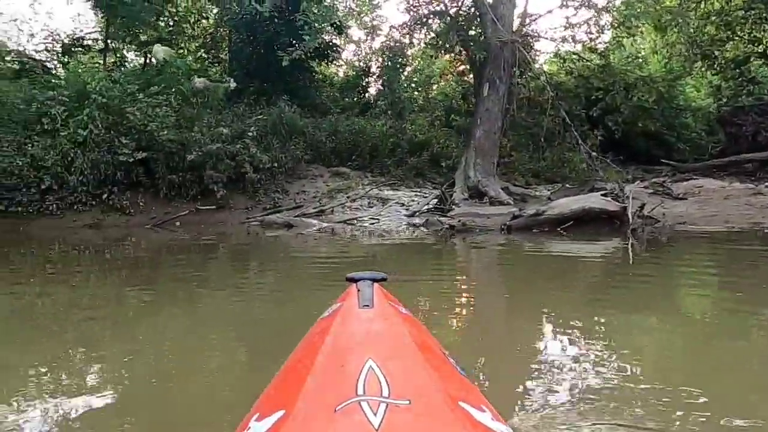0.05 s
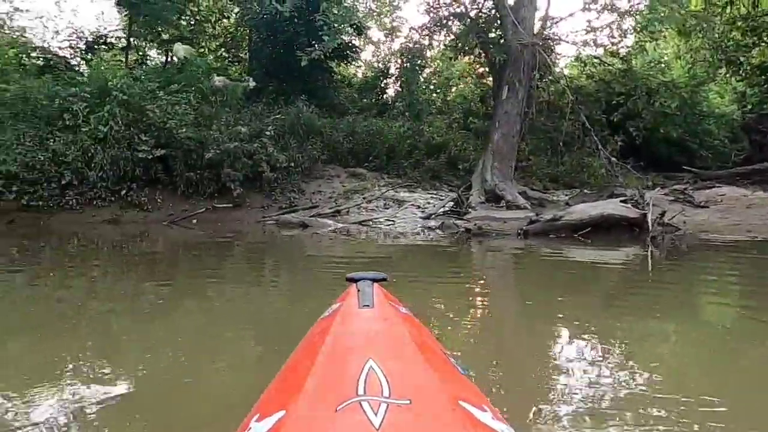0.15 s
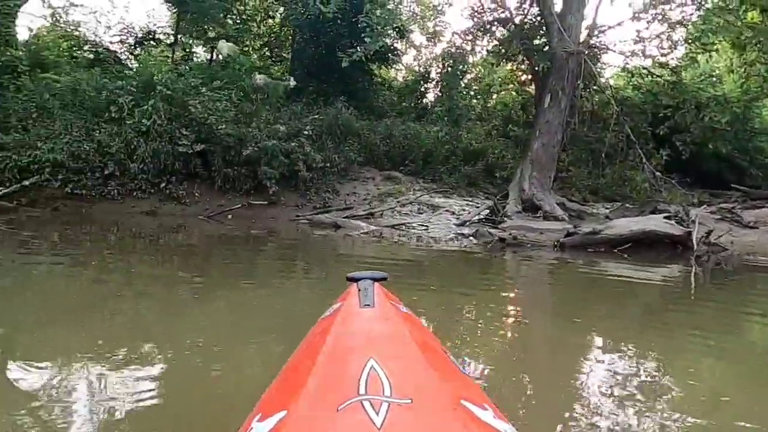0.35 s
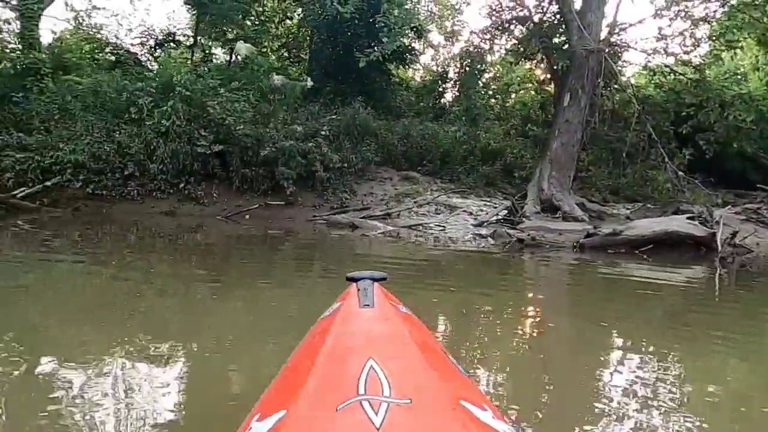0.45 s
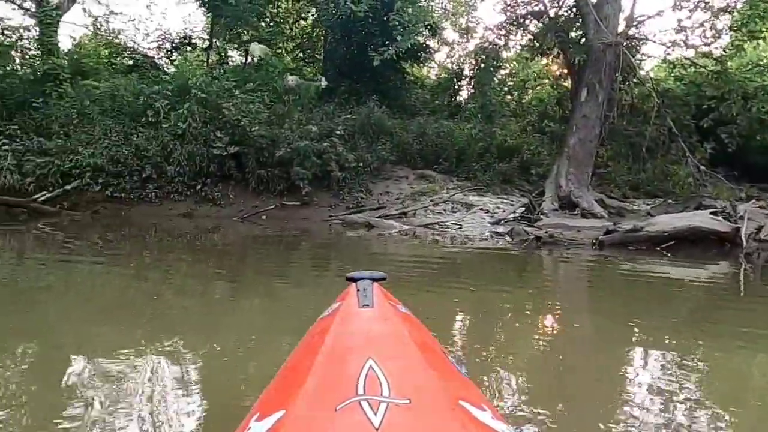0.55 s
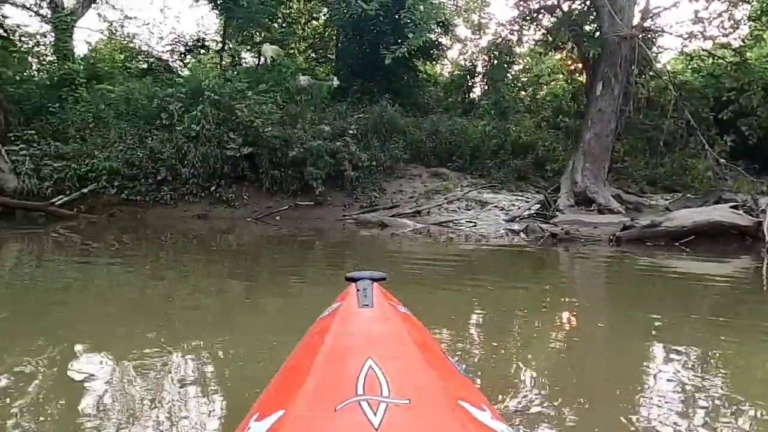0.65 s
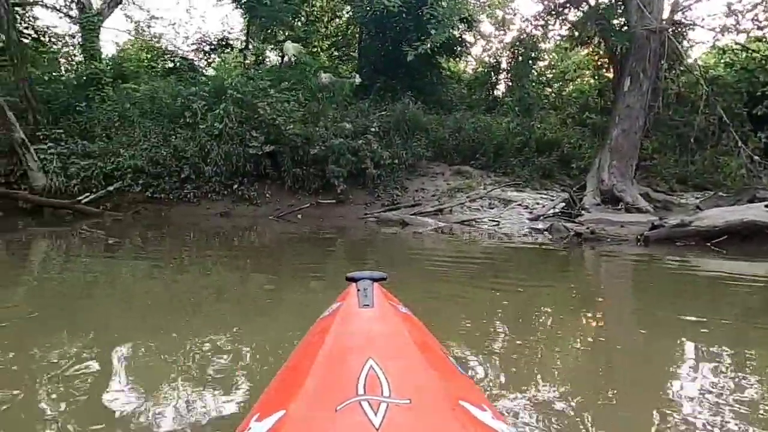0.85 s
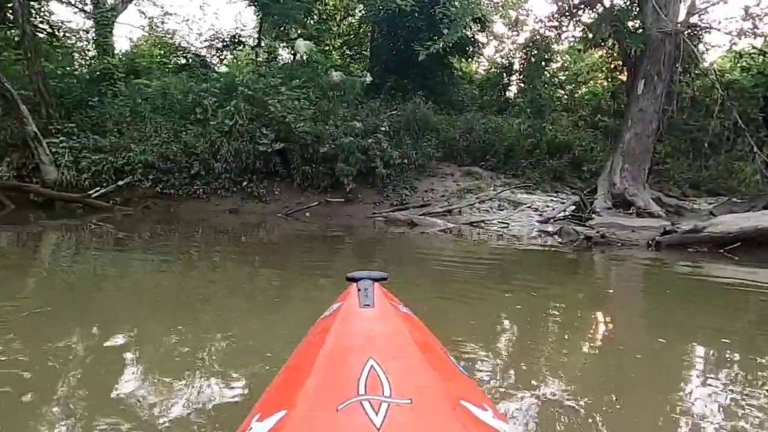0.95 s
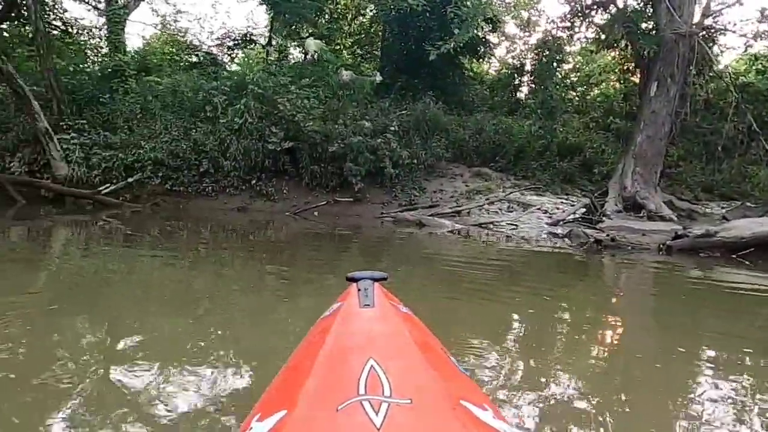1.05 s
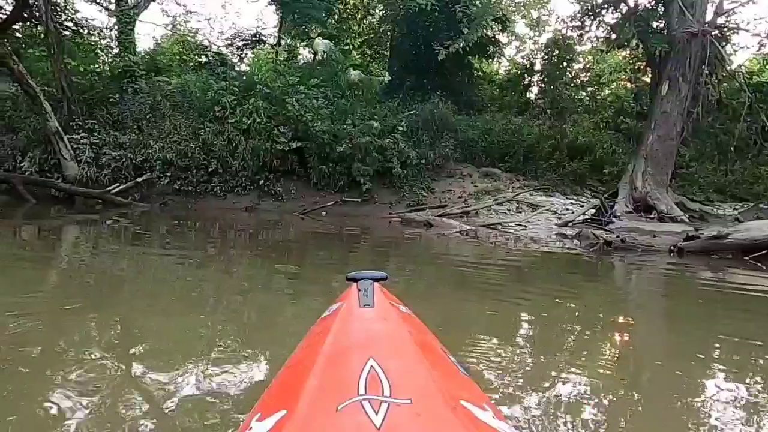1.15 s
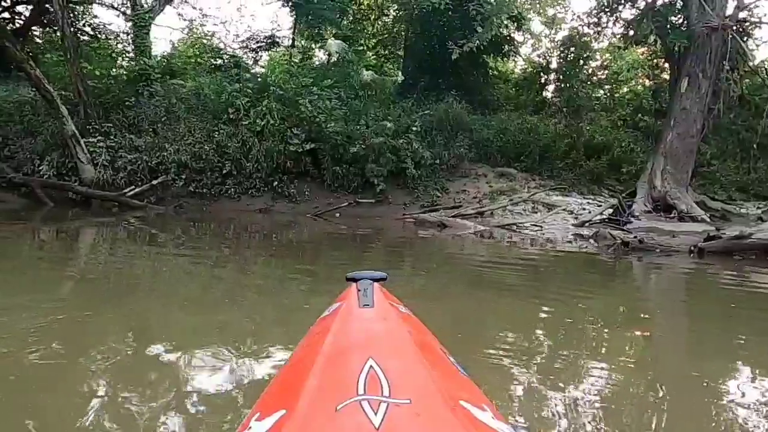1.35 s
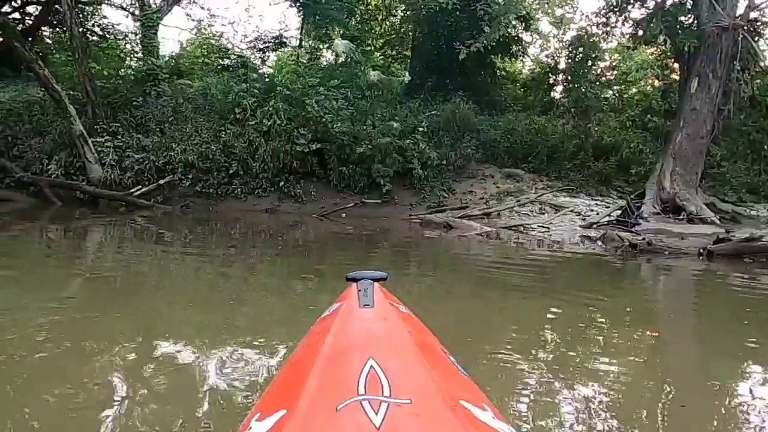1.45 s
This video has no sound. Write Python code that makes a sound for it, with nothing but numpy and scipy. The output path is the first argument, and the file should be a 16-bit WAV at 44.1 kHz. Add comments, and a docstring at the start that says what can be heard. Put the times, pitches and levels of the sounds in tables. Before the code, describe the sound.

A single kayak paddle stroke heard close from the boat: a few bright drips, then the blade plops in with hollow gulps and a bubbly splash, fading to small drips over faint low water rumble outdoors.

```python
"""One kayak paddle stroke on a calm river, heard from the boat.
Drips off the raised blade ring first, as swelling sines led by the right ear, with noise cracks and spatters.
The other blade plops in, gulps air and churns: ringing pockets, gliding sines and low shoves over bubble swarms.
Its wake of small bubbles and swirls then fades as the lead passes to the left ear.
A low rumble of filtered noise runs beneath, with soft reflections from the deck and the bank throughout."""
import sys
import numpy as np
from scipy import signal
from scipy.fft import rfft, irfft, next_fast_len
from scipy.io import wavfile
from scipy.ndimage import map_coordinates

SR = 44100
rng = np.random.default_rng(int(sys.argv[2]) if len(sys.argv) > 2 else 0)


def put_to_file(sound):
    """Save the sound as 16-bit audio at rate SR, in the file named by the first command-line argument."""
    columns = np.atleast_2d(sound).T  # one column per channel
    safe = np.clip(columns, -1, 1)
    whole_steps = np.round(safe * 32767)
    wavfile.write(sys.argv[1], SR, whole_steps.astype(np.int16))


N = 66150  # samples, 1.5 s


def amp(db):
    """Decibels to gain."""
    return 10 ** (np.asarray(db) / 20)


def unit(x):
    """Scale to rms 1."""
    return x / np.sqrt(np.mean(x ** 2) + 1e-20)


def curves(rows):
    """Draw straight lines between rows: one value per sample for each column after the time."""
    times, *columns = np.transpose(rows)
    return np.array([np.interp(np.arange(N) / SR, times, column) for column in columns])


def filtered(x, response):
    """Shape the spectrum of x by a gain that depends on frequency, without phase shift."""
    size = next_fast_len(N + 8192)  # room past the end for the filter to ring
    gain = response(np.fft.rfftfreq(size, 1 / SR))
    return irfft(rfft(x, size) * gain, size)[..., :N]


def coloured(x, points):
    """Equalise x through (frequency [Hz], gain [dB]) points on a log frequency axis."""
    f, db = np.transpose(points)
    return filtered(x, lambda hz: amp(np.interp(np.log(hz + 1), np.log(f), db)))


def add(out, s, sound):
    """Mix a short sound in at time s."""
    part = out[max(0, round(s * SR)):][:len(sound)]
    part += sound[:len(part)]


def tremble(hz, size):
    """The pocket wall trembles: a smooth random gain around 1 that changes about once a cycle."""
    roughness = 0.26  # depth, 0-1
    knots = np.arange(size) * hz / SR
    return 1 + roughness * map_coordinates(rng.standard_normal(size), [knots])


def bubble(t, hz, cycles):
    """A pocket of air swells to its peak in a few cycles and dies, rising a little in pitch."""
    phase_rise, sharpness = 0.01, 1.5  # phase stretch per time to the peak; exponent of the swell
    u = t * hz / cycles  # 1 at the peak
    swell = (u * np.exp(1 - u)) ** sharpness
    return swell * np.sin(2 * np.pi * hz * t * (1 + phase_rise * (u - 1)))


def plops(rows):
    """Each row rings one trembling pocket of air."""
    out, t = np.zeros(N), np.arange(SR // 6) / SR
    for s, hz, db, cycles in rows:
        add(out, s, amp(db) * bubble(t, hz, cycles) * tremble(hz, len(t)))
    return out


def swarm(level, colour, hz, spread, cycles, scatter_db, wash_db, count, size):
    """Many small bubbles of random pitch and strength on a wash of noise, following a level curve."""
    when, pitch, life, strength = rng.random((count, 4)).T[:, :, None]
    grain_hz = hz * 2 ** (spread * (2 * pitch - 1))  # spread in octaves either way
    grains = bubble(np.arange(size) / SR, grain_hz, cycles * (.5 + life))
    grains = grains * amp(scatter_db * strength ** 2)  # a few stand out
    # evenly spaced starts, each jittered by up to two spacings
    starts = ((np.arange(count)[:, None] + 2 * when) * N / count).astype(int)
    cloud = np.bincount((starts + np.arange(size)).ravel(), grains.ravel(), N)[:N]
    wash = unit(coloured(rng.standard_normal(N), colour))
    water = unit(coloured(cloud, colour)) + amp(wash_db) * wash
    return unit(water) * amp(curves(level)[0])


def air_pockets():
    """Drips and the plunging blade trap single pockets of air, which ring."""
    # single pockets: (time [s], pitch [Hz], peak level before trembling [dB], time to peak [cycles])
    pocket_rows = [(.0655, 3600, -29.5, 2.2), (.0738, 1600, -30.5, 1.75), (.080, 3210, -28.5, 3),
                   (.0955, 1180, -30.5, 1.36), (.1498, 2010, -28, 2.8), (.1668, 3670, -18, 2.2),
                   (.1798, 568, -27.5, 1.54), (.2048, 2286, -19.5, 2.4), (.211, 2740, -21, 2.8),
                   (.261, 1060, -31.5, 4.1), (.2932, 1080, -16, 1.24), (.3005, 932, -11.5, 2.24),
                   (.305, 1690, -23, 3), (.321, 855, -19, 1.5), (.3275, 1047, -23.5, 3.5),
                   (.4135, 1200, -14.5, 4.5), (.515, 1340, -17.5, 1.3), (.5215, 744, -12.5, 1.1),
                   (.523, 1930, -21, 3.5), (.5355, 594, -21, 2.7), (.6672, 1095, -23, 2.1),
                   (.687, 2250, -21.5, 4), (.7835, 1710, -22, 2.6), (.8255, 3230, -30, 4),
                   (.8295, 5470, -32, 4.6), (.8985, 964, -24, 2), (.9215, 1240, -29, 2.9),
                   (1.0485, 4130, -39, 4), (1.128, 1380, -29, 2.6), (1.1275, 3450, -33.5, 3),
                   (1.2466, 1740, -22.5, 0.98), (1.2468, 6650, -31, 1.2), (1.2922, 944, -26.5, 0.99),
                   (1.4138, 884, -25.5, 2.3), (1.4505, 6400, -40.5, 3.2)]
    return plops(pocket_rows)


def shoves():
    """The blade shoves water, heard as low, briefly ringing thumps."""
    # pushes: (time [s], pitch [Hz], peak level before trembling [dB], time to peak [cycles])
    shove_rows = [(.365, 151, -28, 0.78), (.365, 56, -34, 1.3), (.496, 253, -19.5, 1.1),
                  (.511, 166.7, -22.5, 2.1), (.5165, 298, -14.5, 0.58)]
    return plops(shove_rows)


def gurgles():
    """Air pockets glide in pitch, unevenly, as they change size: up as they shrink, down as they grow."""
    # glides: (time [s], length [s], start pitch [Hz], end pitch [Hz], peak level before trembling [dB])
    glide_rows = [(0.306, 0.064, 245.4, 307, -28.5), (0.352, 0.0206, 856, 1254, -23.5),
                  (0.37, .016, 1378, 2140, -25), (0.426, .028, 537, 816, -22.5),
                  (0.462, 0.0092, 1174, 810, -17), (1.034, 0.12, 91.6, 106.7, -36.5),
                  (1.081, 0.0225, 734, 964, -32.5), (1.29, 0.15, 103.6, 195, -42.5),
                  (1.419, .016, 1010, 840, -32.5)]
    out = np.zeros(N)
    for s, length, start_hz, end_hz, db in glide_rows:
        u = np.linspace(0, 1, int(length * SR))
        shake = tremble(start_hz, SR // 4)[:len(u)]
        glide_hz = start_hz * (end_hz / start_hz) ** u * (1 + shake) / 2  # half the tremble bends the pitch
        phase = 2 * np.pi * np.cumsum(glide_hz) / SR
        add(out, s, amp(db) * np.sin(np.pi * u) * shake * np.sin(phase))
    return out


def churn():
    """Big bubbles stirred up by the blade make a low, lumpy swarm."""
    # swell of the churn: (time [s], level [dB])
    churn_level = [(0, -43), (.24, -54.5), (.275, -34), (.33, -42), (.40, -32), (.44, -28), (.475, -41),
                   (.505, -27.5), (.57, -28.5), (.70, -33.5), (.78, -29), (.87, -36), (1.2, -39.5),
                   (1.36, -45.5)]
    # equaliser of the churn: (frequency [Hz], gain [dB])
    churn_colour = [(40, -25), (110, -4.5), (300, 1), (450, 4), (650, 2), (900, -13), (2000, -63)]
    return swarm(churn_level, churn_colour, hz=394.0, spread=1.297, cycles=1.1,
                 scatter_db=12, wash_db=-2.5, count=450, size=1800)


def splash():
    """Middling bubbles stirred up by the blade make a splashing swarm above the churn."""
    # swell of the splash: (time [s], level [dB])
    splash_level = [(.245, -49.5), (.28, -34), (.40, -39), (.45, -29.5), (.49, -30.5), (.525, -20.5),
                    (.555, -30.5), (.72, -37.5), (.785, -32), (.84, -36), (.95, -37), (1.14, -40),
                    (1.37, -45), (1.5, -45)]
    # equaliser of the splash: (frequency [Hz], gain [dB])
    splash_colour = [(250, -50), (600, -6), (950, -0.5), (1550, -3.5), (2100, -3.5), (2900, -11.5),
                     (6000, -51)]
    return swarm(splash_level, splash_colour, hz=1276, spread=0.937, cycles=1.63,
                 scatter_db=11.5, wash_db=-3.5, count=950, size=800)


def slaps():
    """A falling drop cracks on the surface: a band of noise that dies at once."""
    # drops: (time [s], peak level [dB])
    slap_rows = [(0.2113, -20.5), (.7853, -27.5), (1.247, -24.5), (1.4798, -44)]
    t60, low_hz, top_hz = 0.013, 670, 4670  # decay by 60 dB (s) and noise band
    out, t = np.zeros(N), np.arange(SR // 40) / SR
    band = signal.butter(3, [low_hz, top_hz], 'band', fs=SR, output='sos')
    for s, db in slap_rows:
        crack = signal.sosfilt(band, rng.standard_normal(len(t)) * amp(-60 * t / t60))
        add(out, s, amp(db) * crack / np.abs(crack).max())
    return out


def spatters():
    """A handful of droplets patters down, each trapping a tiny bubble."""
    # handfuls: (time [s], peak level [dB])
    handful_rows = [(.205, -23.5), (.355, -24), (.419, -27), (.450, -23), (.460, -25.5), (.502, -23),
                    (.684, -29.5), (0.733, -32.5), (.853, -29), (.953, -28)]
    handful_s, droplet_hz, octaves, cycles = .014, 3040, 0.87, 0.88  # octaves: scale of the pitch spread
    out, t = np.zeros(N), np.arange(SR // 200) / SR
    for s, db in handful_rows:
        patter = np.zeros(SR // 20)
        for when, pitch in zip(rng.random(size=36), rng.uniform(-1.05, 1, size=36)):
            droplet = bubble(t, droplet_hz * 2 ** (octaves * pitch), cycles)
            add(patter, when * handful_s, rng.uniform(-1.12, 1) * droplet)  # random strength and sign
        add(out, s, amp(db) * patter / np.abs(patter).max())
    return out


def spray():
    """Tiny bubbles and droplets make a fine, bright swarm."""
    # swell of the spray before mixing: (time [s], level [dB])
    spray_level = [(.12, -49.5), (.22, -48), (.26, -47), (.31, -42.5), (.40, -45), (.455, -38.5),
                   (.485, -40), (.545, -35.5), (.575, -41), (.72, -46.5), (.78, -41), (.91, -50.5),
                   (.96, -50.5), (1.15, -50), (1.5, -62)]
    # equaliser of the spray: (frequency [Hz], gain [dB])
    spray_colour = [(1000, -11), (2000, -10), (2700, -6.5), (3900, -8.5), (7000, -16), (9000, -19.5),
                    (12000, -44)]
    return swarm(spray_level, spray_colour, hz=4200, spread=1.016, cycles=1.93,
                 scatter_db=21.5, wash_db=-2.5, count=1300, size=300)


def strewn_spray():
    """Independent spray on each side, strongest in the treble, sounds wide."""
    # equaliser of the wide spray: (frequency [Hz], gain [dB])
    wide_colour = [(1500, -16), (4000, -4.5), (8000, -0.5)]
    return coloured(np.array([spray(), spray()]), wide_colour)


def rumble():
    """Water pushing along the hull, as low filtered noise."""
    # swell of the rumble: (time [s], level [dB])
    rumble_level = [(0, -40), (.11, -39), (.17, -47.5), (.33, -50), (.39, -46), (.54, -35), (.68, -37.5),
                    (.95, -45), (1.25, -45), (1.5, -53)]
    # equaliser of the rumble: (frequency [Hz], gain [dB])
    rumble_colour = [(20, -27.5), (36, -7.5), (50, -4), (75, -2), (170, -5), (300, -13.5), (1000, -55.5)]
    return unit(coloured(rng.standard_normal(N), rumble_colour)) * amp(curves(rumble_level)[0])


def placed(x):
    """The ear that leads passes from right to left, while a separate treble balance tilts the sides."""
    # path: (time [s], lead of the right ear [microseconds], left-over-right treble [dB])
    path = [(0, 88, 7.5), (.3, 82.5, -2), (.5, 46.5, 1.5), (.9, 27, 3.5), (1.28, -28, 10)]
    shadow_hz = 690  # the balance acts above this
    lead_us, pan_db = curves(path)
    low = filtered(x, lambda hz: 1 / (1 + (hz / shadow_hz) ** 2))
    treble = x - low
    shift = lead_us * SR / 2e6  # half the lead, in samples, for each ear
    ears = []
    for side in (1, -1):  # left, right
        tilted = low + treble * amp(side * pan_db / 2)
        ears.append(map_coordinates(tilted, [np.arange(N) - side * shift]))
    return np.array(ears)


def echoes(x, t60):
    """A diffuse tail of decaying noise, different on each side."""
    t = np.arange(SR // 3) / SR
    tail = rng.standard_normal((2, len(t))) * amp(-60 * t / t60)
    tail = tail / np.linalg.norm(tail, axis=1, keepdims=True)
    return signal.fftconvolve(x[None], tail, axes=1)[:, :N]


def deck(water):
    """Short reflections scatter off the deck."""
    # equaliser of the deck: (frequency [Hz], gain [dB])
    deck_colour = [(100, -17.5), (500, -38), (1200, -17.5), (2600, -7.5)]
    return coloured(echoes(water, t60=0.041), deck_colour)


def bank(water):
    """The bank answers faintly with a longer tail."""
    return amp(-19) * echoes(water, t60=0.52)


def scene():
    """The stroke with widely strewn spray, reflections from the deck and a faint answer from the bank."""
    blade = air_pockets() + shoves() + gurgles() + churn() + splash()
    drops = slaps() + spatters() + amp(-0.5) * spray()
    water = blade + drops + rumble()
    return placed(water) + strewn_spray() + deck(water) + bank(water)


def record(dry):
    """The microphone dulls the top, and nothing passes above the band limit."""
    # microphone response: (frequency [Hz], gain [dB])
    mic_colour = [(8000, 0), (12000, -3.5)]
    top_hz = 12554
    return filtered(coloured(dry, mic_colour), lambda hz: hz < top_hz)


dry = scene()
out = record(dry)
put_to_file(out)
```